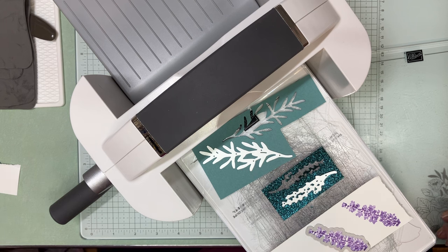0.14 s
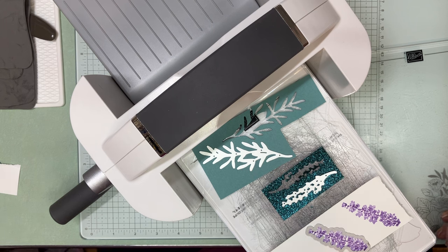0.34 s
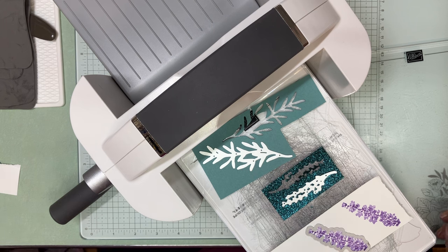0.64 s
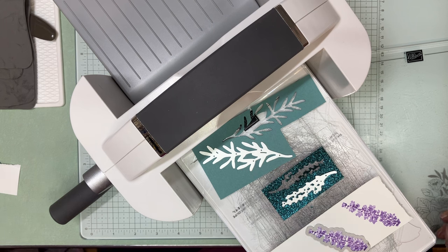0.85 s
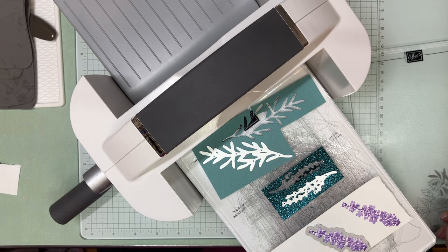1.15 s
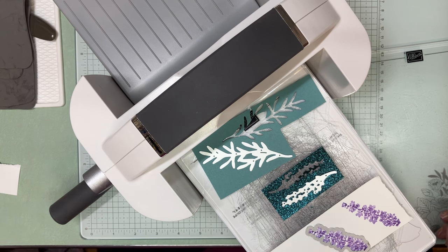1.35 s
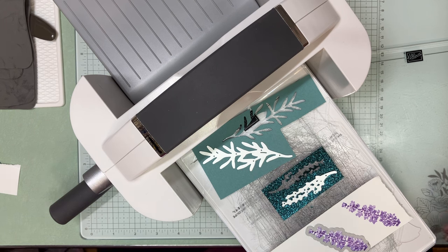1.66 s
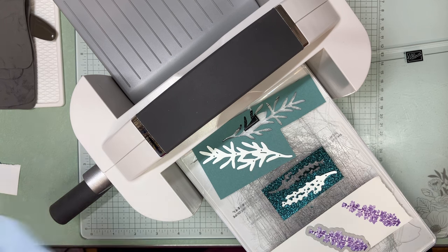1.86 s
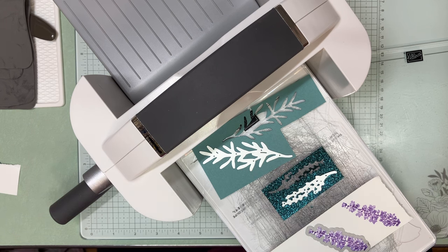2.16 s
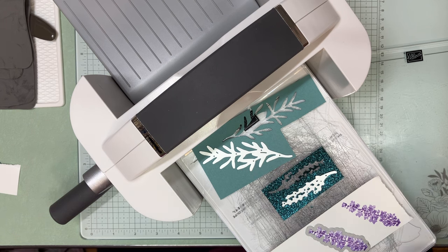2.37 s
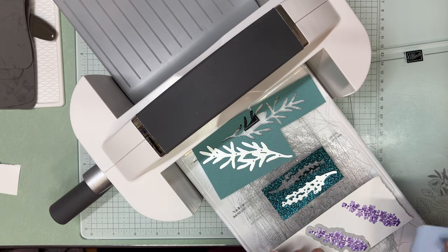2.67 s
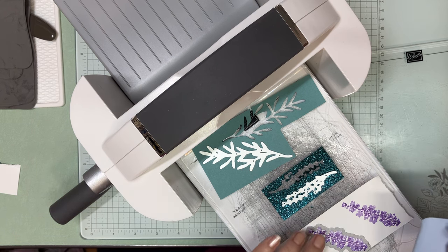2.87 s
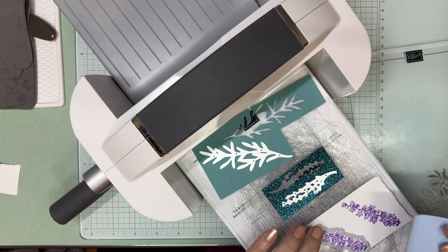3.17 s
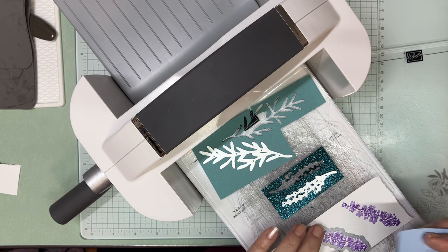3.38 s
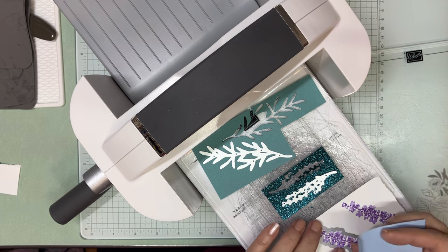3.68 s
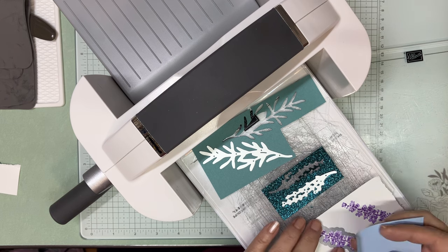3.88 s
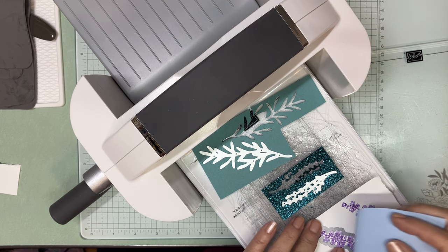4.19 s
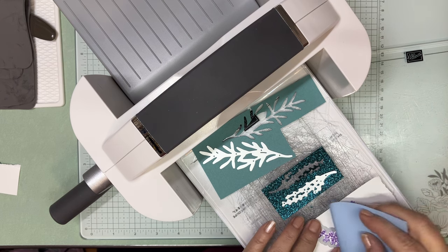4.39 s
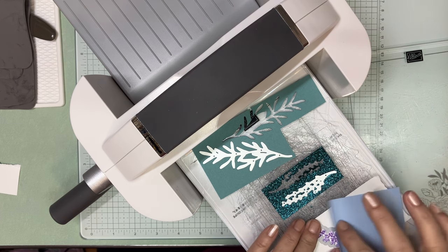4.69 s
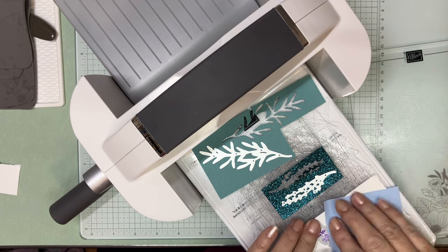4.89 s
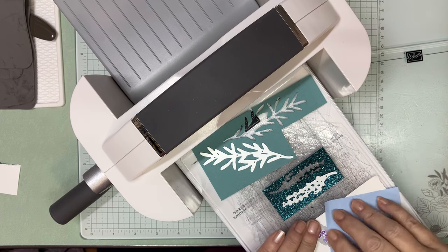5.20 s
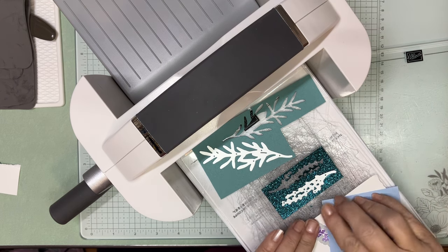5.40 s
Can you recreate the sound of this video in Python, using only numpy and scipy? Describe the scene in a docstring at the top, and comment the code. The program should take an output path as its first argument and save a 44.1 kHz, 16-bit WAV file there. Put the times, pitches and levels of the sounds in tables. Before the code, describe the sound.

Papery rustles, crackly snaps and light knocks come close up, then a quiet lull before soft pressing, rubbing and thumps on a plastic plate.

```python
"""In a quiet room with a low rumble, hands peel a sticky note off its pad: grainy noise rustles in strokes,
fingers and pad knock plate and table (dying modes), and paper snaps in resonant crackly bursts.
From 2.3 s the note's edge scrapes on paper, as friction noise through a resonance.
Last, hands press and smooth the note onto paper lying on a plastic plate, which sings under the fingertips.
A close pair of microphones hears the treble a little earlier on the right."""
import sys
import numpy as np
from scipy import signal
from scipy.fft import rfft, irfft, next_fast_len
from scipy.io import wavfile
from scipy.ndimage import uniform_filter1d

SR = 44100
rng = np.random.default_rng(int(sys.argv[2]) if len(sys.argv) > 2 else 0)


def dump_mix(stems):
    """Bounce the given channels to the path in sys.argv[1] as a 16-bit WAV at rate SR."""
    frames = np.atleast_2d(stems).T  # one column per channel
    limited = np.clip(frames, -1, 1)  # hard clip at full scale
    pcm = np.round(limited * 32767).astype(np.int16)
    wavfile.write(sys.argv[1], SR, pcm)


N = 244622
PADDED = next_fast_len(N)
HZ = np.fft.rfftfreq(PADDED, 1 / SR)
T = np.arange(N) / SR


def amp(db):
    """Decibels to gain."""
    return 10 ** (np.asarray(db) / 20)


def evened(x):
    """Scales to rms 1."""
    return x / np.sqrt(np.mean(x ** 2) + 1e-20)


def wander(samples):
    """Smoothed random curve of rms 1, averaged over this many samples."""
    return evened(uniform_filter1d(rng.standard_normal(N), samples))


def read(points):
    """A spectrum table at every frequency, joined on a log axis."""
    f, value = np.transpose(points)
    return np.interp(np.log(HZ + 1), np.log(f + 1), value)


def shaped(x, gain):
    """Filters by a gain given at every frequency."""
    return irfft(rfft(x, PADDED) * gain, PADDED)[..., :N]


def add(mix, s, sound):
    """Mixes a sound in at time s."""
    part = mix[..., round(s * SR):][..., :sound.shape[-1]]
    part += sound[..., :part.shape[-1]]


def air():
    """Faint steady hiss of the room over a rumble that swells slowly."""
    # Spectrum of the empty room: hz, level_db (per Hz, relative)
    room_spectrum = [(15, -37.5), (30, -30), (48, -2.5), (68, 1), (90, -8), (130, -14), (200, -29),
                     (330, -27), (700, -38), (1200, -51.5), (2000, -38.5), (2650, -40.5), (2950, -33.5),
                     (3250, -54.5), (4500, -42.5), (8000, -51), (16500, -49.5)]
    room_db, swell_db, rumble_hz = -60, 4.6, 150
    noise = shaped(rng.standard_normal((2, N)), amp(read(room_spectrum)))
    low = 1 / (1 + (HZ / rumble_hz) ** 2)
    rumble = amp(swell_db * wander(6000)) * shaped(noise, low)
    hiss = shaped(noise, 1 - low)
    return amp(room_db) * evened(rumble + hiss)


def paper(grain_db, grain_size, patchy_db):
    """Paper-coloured noise in short uneven grains, its colour drifting at random in narrow patches."""
    # Colour of handled paper: hz, level_db (per Hz, relative)
    paper_spectrum = [(110, -30.5), (240, -1), (700, -7.5), (1700, -7.5), (3100, -4.5), (4500, -5.5),
                      (5900, -7), (7200, -4.5), (8600, -7), (11400, -6), (14000, -13), (16500, -8.5)]
    grains = amp(grain_db * wander(grain_size))
    z = signal.stft(rng.standard_normal((2, N)) * grains, nperseg=512, noverlap=384)[2]
    patches = rng.standard_normal(z.shape[1:])
    patches = uniform_filter1d(patches, size=3, axis=0)  # across frequency
    patches = evened(uniform_filter1d(patches, size=40, axis=1))  # along time
    x = signal.istft(z * amp(patchy_db * patches), nperseg=512, noverlap=384)[1][:, :N]
    return shaped(x, amp(read(paper_spectrum)))


def split(x, body_hz=None, flap_hz=None, lift=0):
    """Parts a sound into hiss, body and flap of rms 1; body and flap may peak at a resonance."""
    flap_top_hz, body_top_hz = 1200, 4000
    hz = np.fft.rfftfreq(x.shape[-1], 1 / SR)
    low = 1 / (1 + (hz / flap_top_hz) ** 8)
    high = 1 / (1 + (hz / body_top_hz) ** 8)
    shares = [1 - high, high - low, low]  # of the power
    if lift:
        for k, f in ((1, body_hz), (2, flap_hz)):
            peak = 1 / (1 + ((hz - f) / (0.07 * f)) ** 2)
            shares[k] = shares[k] * (1 + lift * peak)
    return np.array([evened(irfft(rfft(x) * np.sqrt(share), x.shape[-1])) for share in shares])


def stroke(s, rise, hold, fall):
    """Power of a stroke that swells, holds and fades."""
    swing_db = 30  # covered in one rise or fall time
    before = (s - T) / max(rise, .002)
    after = (T - s - hold) / max(fall, .002)
    away = np.clip(np.maximum(before, after), 0, 5)
    return amp(-2 * swing_db * away)  # doubled, since this is power


def rustle():
    """The sheet slides and bends under the hands: paper noise in strokes, each with its own three-band mix."""
    # Strokes of sliding and bending paper:
    # full_at_s, rise_s, hold_s, fall_s, hiss_db, body_db (above hiss), flap_db (above hiss)
    strokes = [(0.045, .03, 0.057, .05, -60.5, -8, -16), (0.1, .02, 0.089, 0.17, -54, -20, -26),
               (0.215, 0.094, .003, 0.12, -49.5, -10, -23), (0.332, 0.15, 0.044, 0.092, -54.5, -17, -42),
               (.37, 0.046, .06, 0.11, -60.5, 2, -5), (0.427, 0.034, .003, 0.061, -49, -20, -30),
               (0.482, .03, 0.035, 0.041, -62, -11, 4.5), (0.537, 0.21, .003, .13, -45, -16, -8.5),
               (0.651, 0.062, 0.12, 0.09, -64, -14.5, -12.5),
               (0.862, 0.045, 0.0026, 0.088, -44.5, -5.5, -3.5), (0.993, 0.035, .003, 0.086, -67.5, 5, 0),
               (1.179, 0.063, 0.0034, 0.077, -65, -1, -3), (1.273, .03, 0.092, .05, -65, -3, -7),
               (1.393, 0.047, 0.048, 0.092, -42.5, -0.5, -10), (1.548, .08, 0.079, 0.04, -49, -16, -34),
               (1.715, 0.13, .005, 0.095, -47, 5.5, -0.5), (1.76, .02, 0.0061, 0.12, -49.5, -1.5, -13),
               (1.868, 0.29, 0.0035, 0.036, -49, -17, -31), (1.891, 0.037, 0.0032, 0.11, -53.5, -0.5, -4.5),
               (1.96, .03, 0.15, 0.015, -70.5, -8.5, -25), (2.038, 0.029, .003, 0.041, -78, -17, 16.5),
               (2.107, .03, 0.096, 0.061, -53, -3, -31), (2.235, 0.042, 0.037, 0.043, -44.5, -5, -23),
               (2.313, 0.079, .003, 0.054, -44.5, -7, -34), (2.361, .03, 0.13, 0.094, -55, -14.5, -23),
               (2.585, 0.25, 0.0067, 0.31, -61.5, -11, -12.5), (2.808, .1, .003, 0.11, -75, -3.5, -29),
               (2.958, 0.1, 0.0032, .3, -81.5, 2, 0), (3.213, 0.06, .003, 0.11, -57, 0.5, -12.5),
               (3.289, 0.12, 0.27, 0.14, -93.5, 12, 12.5), (3.52, 0.18, 0.0018, 0.065, -80, -9, -15),
               (3.629, 0.1, 0.05, .05, -75.5, -1.5, -2.5), (3.695, 0.022, 0.0095, 0.13, -81, 3, 18),
               (4.083, 0.13, 0.0032, 0.089, -67, -4, -12), (4.183, 0.024, .003, 0.039, -73.5, 0, -20),
               (4.342, .025, 0.0027, 0.091, -60.5, -9.5, -45), (4.436, .03, 0.057, 0.14, -56.5, -15, -37),
               (4.583, 0.14, 0.12, 0.12, -49.5, -12, -42), (4.89, 0.6, .003, .05, -66, -19, -8),
               (5.006, 0.12, 0.0036, 0.073, -46, -20.5, -15.5), (5.141, 0.096, 0.0027, .1, -71, 3, 13.5),
               (5.291, 0.29, .003, 0.046, -51, -35, -19), (5.335, 0.031, 0.0027, 0.083, -55, 10, 17),
               (5.377, 0.009, 0.047, 0.074, -55, -18, 4.5), (5.54, 0.16, .003, .05, -78.5, 4, 13.5)]
    power = np.zeros((3, N))
    for s, rise, hold, fall, hiss_db, body_db, flap_db in strokes:
        band_db = hiss_db + np.array([[0], [body_db], [flap_db]])
        power += stroke(s, rise, hold, fall) * amp(band_db) ** 2
    sheet = paper(grain_db=2.8, grain_size=100, patchy_db=3)
    sheet = np.pad(sheet, ((0, 0), (0, PADDED - N)))  # a length quick to transform
    return np.einsum("bcn,bn->cn", split(sheet)[..., :N], np.sqrt(power))  # b bands, c channels


def ring(modes, soft_s):
    """Dying modes with a softened start, slightly different at each call."""
    t = T[:SR // 2]
    tones = np.zeros(len(t))
    for hz, db, t60 in modes:
        level_scatter, pitch_scatter = rng.standard_normal(2)
        fading = amp(db + 1.5 * level_scatter - 60 * t / t60)
        tones += fading * np.sin(2 * np.pi * hz * (1 + .02 * pitch_scatter) * t)
    return tones * (1 - np.exp(-t / soft_s))


def knocks():
    """A blow of fingers or pad rings the plate at once and the table a moment later."""
    # Blows: start_s, plate_db, table_db (above plate), pitch_hz (of the plate where struck)
    blows = [(.021, -57, -1, 800), (.198, -45, -13, 677), (0.4085, -34, -8, 820), (.432, -34, 3, 421),
             (0.443, -35.5, -16.5, 800), (0.842, -40, -24, 444), (0.857, -48.5, -1.5, 365),
             (1.44, -40, -11, 417), (1.691, -23.5, -16.5, 1034), (2.278, -47.5, -23, 507),
             (3.685, -39.5, -16, 1103), (3.69, -53, -9.5, 763), (5.117, -41.5, -1.5, 1330),
             (5.3164, -17.5, -5.5, 785), (5.363, -29.5, -9, 910), (5.394, -37.5, 7, 800)]
    # Modes of the plastic plate: multiple of the blow's pitch, level_db, t60_s
    plate_modes = [(1, -1.5, 0.05), (1.19, -4, 0.021), (1.85, -9.5, 0.037), (3, -17.5, .03)]
    # Modes of the table: hz, level_db, t60_s
    table_modes = [(103.4, -6.5, 0.27), (128, -2.5, 0.092), (308, -10, 0.093)]
    table_delay_s = 0.012
    out = np.zeros((2, N))
    for s, db, table_db, hz in blows:
        struck = np.multiply(plate_modes, [hz, 1, 1])
        plate = np.array([ring(struck, soft_s=.002) for side in out])  # drawn anew for each side
        add(out, s, amp(db) * plate)
        add(out, s + table_delay_s, amp(db + table_db) * ring(table_modes, soft_s=0.0042))
    return out


def snaps():
    """Each snap is a crackly burst that rises fast and dies away, the flap more slowly than the crack."""
    # Paper snaps and slips: start_s, crack_db, body_db (above crack), flap_db (above crack),
    # t60_s (of the crack, at least 0.01 s), body_hz, flap_hz
    bursts = [(.043, -66, -1, -30, 0.19, 3620, 250), (0.082, -36.5, -6, -20, 0.12, 3970, 900),
              (0.194, -48, -6, -9.5, 0.12, 4310, 700), (0.37, -44, -8, -2, 0.12, 2300, 720),
              (.4315, -35, -15, -15.5, 0.048, 4270, 780), (.439, -60.5, -28, 16.5, 0.13, 1310, 253),
              (.826, -52, -4.5, -2.5, 0.13, 2640, 830), (0.854, -31, -6.5, -2.5, 0.032, 4470, 375),
              (0.98, -59, -2, -0.5, 0.1, 1250, 277), (1.148, -51, -6, -6, 0.13, 3930, 304),
              (1.2617, -47.5, -4, -9.5, 0.084, 3500, 820), (1.386, -38.5, -23, -24, 0.089, 4140, 770),
              (1.412, -38, 0.5, -4, .17, 4060, 350), (1.439, -33, -15, 0.8, .045, 3910, 445),
              (1.6545, -32.5, 1, -9, 0.19, 1810, 870), (1.68, -35.5, 5.5, 0.5, 0.11, 2160, 730),
              (1.7002, -42.5, -6, 4.8, 0.11, 1250, 1060), (1.748, -39, 2.5, -15.5, .05, 4240, 403),
              (1.8785, -57, 15, 8, 0.078, 1500, 730), (1.941, -47.5, -31, -20.5, 0.045, 2930, 714),
              (2.0995, -47.5, -1, -3.5, 0.083, 1390, 402), (2.1878, -41, 7, 2, 0.1, 2310, 475),
              (2.2112, -32.5, 6, -5.5, 0.042, 4530, 1060), (2.267, -43, -8, -10.5, 0.079, 3300, 494),
              (2.3165, -41, -9, -19, 0.073, 3720, 421), (3.166, -66, -3.5, -17.5, .052, 1920, 268),
              (3.193, -31.5, -14, -32, 0.033, 2290, 875), (3.198, -38, -3, -30, 0.026, 2200, 875),
              (3.666, -55.5, -4.5, -12, 0.092, 1740, 1100), (4.28, -52.5, -16, -33.5, 0.21, 3620, 315),
              (4.42, -49.5, -34, -32, 0.042, 3670, 1090), (4.642, -23, -10, -26.5, 0.091, 4200, 1100),
              (4.882, -52, -18, -10, 0.038, 1200, 1090), (4.9225, -55, -10.5, -22, 0.085, 1210, 1000),
              (5.1175, -57, -14, 10, 0.046, 1340, 284), (5.138, -42.5, -42, -13, 0.036, 1220, 1100),
              (5.3151, -43.5, 12, 12, 0.065, 1390, 730), (5.371, -40.5, -38, 13, 0.029, 1330, 310)]
    rise_share = .03  # of the t60
    slowness = np.array([[1], [1.1], [1.4]])  # t60 of crack, body and flap over the crack's
    out, t = np.zeros((2, N)), T[:8192]
    crackle = paper(grain_db=3.2, grain_size=70, patchy_db=2.5)
    crackle = np.pad(crackle, ((0, 0), (0, len(t))), "wrap")
    for s, db, body_db, flap_db, t60, body_hz, flap_hz in bursts:
        rise = max(rise_share * t60, 1e-4)
        onset = np.minimum(t / rise, 1) ** 2
        fade_db = -60 * np.maximum(t - rise, 0) / (max(t60, .01) * slowness)
        band_db = db + np.array([[0], [body_db], [flap_db]])
        levels = onset * amp(band_db + fade_db)
        piece = crackle[:, round(s * SR):][:, :len(t)]
        parts = split(piece, body_hz, flap_hz, lift=14)
        add(out, s, np.einsum("bcn,bn->cn", parts, levels))
    return out


def friction(hz, width_hz):
    """Uneven friction noise through one resonance."""
    slips = amp(4.0 * wander(400))
    resonance = 1 / (1 + ((HZ - hz) / width_hz) ** 2)
    return evened(shaped(rng.standard_normal((2, N)) * slips, resonance))


def scrape():
    """The note's edge scrapes on the paper: strokes of friction noise in one broad band."""
    # Scrapes: full_at_s, rise_s, hold_s, fall_s, level_db
    scrapes = [(2.343, .02, 0.163, .03, -67), (2.588, 0.16, .003, 0.32, -63),
               (4.1, 0.098, 0.0033, .02, -61), (4.192, 0.21, .003, 0.04, -75)]
    power = sum(stroke(s, rise, hold, fall) * amp(db) ** 2 for s, rise, hold, fall, db in scrapes)
    return np.sqrt(power) * friction(hz=1970, width_hz=520)


def rub():
    """Fingertips rub the plate, which sings in one narrow band."""
    # Loudness of the rubbing, joined by straight lines: time_s, level_db
    rub_levels = [(4.38, -104), (4.434, -71), (4.6, -88), (4.756, -60.5), (4.83, -79), (5.014, -55.5),
                  (5.09, -69), (5.214, -50), (5.32, -70), (5.44, -55), (5.47, -83), (5.505, -65),
                  (5.547, -63.5)]
    s, db = np.transpose(rub_levels)
    return amp(np.interp(T, s, db)) * friction(hz=1130, width_hz=80)


def walls(x):
    """Reflections: noise tails, each band dying at its own speed."""
    # Decay of the room: hz, t60_s
    room_decay = [(200, 0.37), (1500, 0.034), (6000, 0.19), (15000, 0.59)]
    f, decay_s = np.transpose(room_decay)
    hz, t, z = signal.stft(rng.standard_normal((2, SR // 2)), SR, nperseg=256)
    t60 = np.interp(np.log(hz + 1), np.log(f), decay_s)
    tail = signal.istft(z * amp(-60 * t / t60[:, None]), SR, nperseg=256)[1]
    tail = np.pad(tail, ((0, 0), (200, 0)))  # samples before the first reflection
    tail = tail / np.linalg.norm(tail[0])
    return signal.fftconvolve(x, tail, axes=1)[:, :N]


def scene():
    """Two views of the same events, their noise unrelated, with the room's answer."""
    walls_db = -15.5
    hands = rustle() + knocks() + snaps() + scrape() + rub()
    return air() + hands + amp(walls_db) * walls(hands)


def record(dry):
    """The right microphone shares most of the left's sound, shifted in phase; then the band limit."""
    # Left-right likeness: hz, likeness (0 to 1)
    likeness = [(60, .97), (130, .93), (300, .86), (1000, .75), (2500, .55), (5400, .65), (7100, .88),
                (8500, .98), (16500, .96)]
    # Phase by which the right leads: hz, lead_rad
    phase_lead = [(0, 0), (1000, .2), (2670, 1.9), (4050, 1.4), (5400, 3.14), (6630, 6.1), (7580, 7.2),
                  (9280, 9.42), (11400, 12.57), (13520, 15.71), (16500, 20.1)]
    # Balance of the pair: hz, left_over_right_db
    balance = [(100, 1.5), (600, 2), (2500, 3.5), (4500, -0.5), (6000, 0.5), (9000, -0.5)]
    edge_hz = 15850
    hz, turn = np.transpose(phase_lead)
    same = np.clip(read(likeness), 0, 1)
    lead = np.exp(1j * np.interp(HZ, hz, turn))
    tilt = amp(read(balance) / 2)  # half on each side
    shares = np.array([same, np.sqrt(1 - same ** 2)])
    right = shaped(dry, lead / tilt * shares).sum(0)
    pair = np.array([shaped(dry[0], tilt), right])
    band_limit = signal.firwin(511, edge_hz, window=("kaiser", 9), fs=SR)
    return signal.oaconvolve(pair, band_limit[None], "same")


dry = scene()
out = record(dry)
dump_mix(out)
```